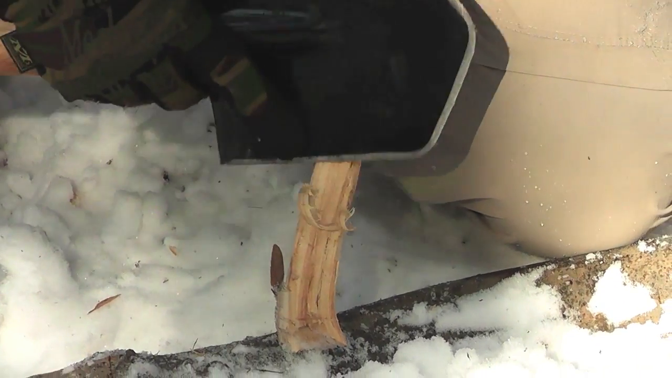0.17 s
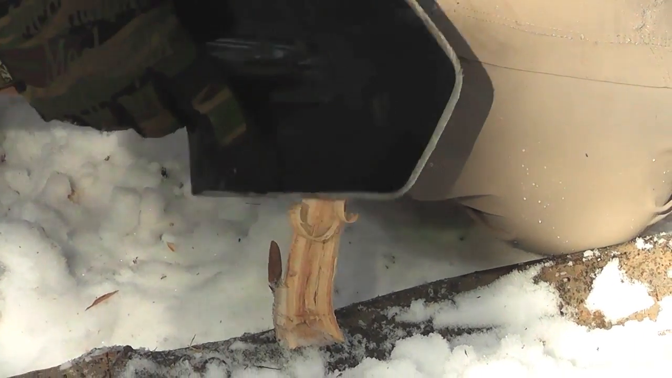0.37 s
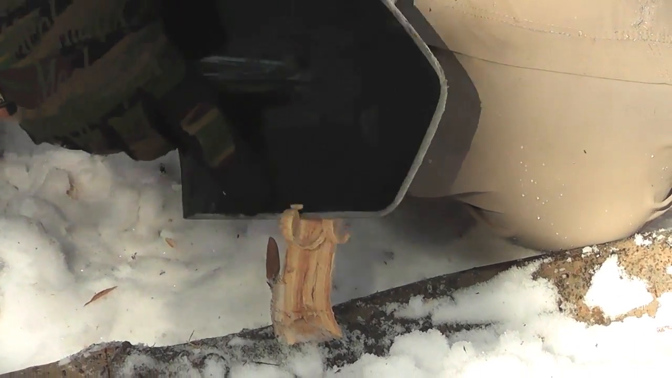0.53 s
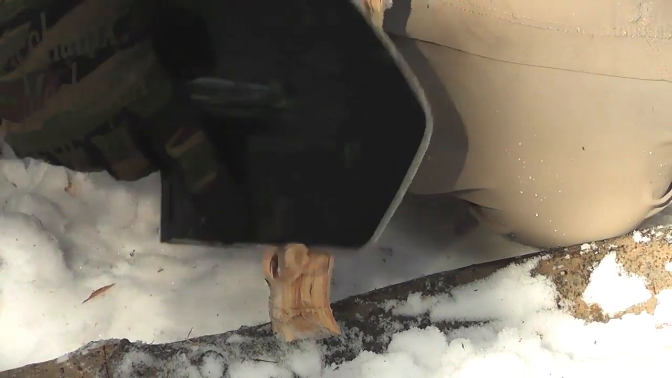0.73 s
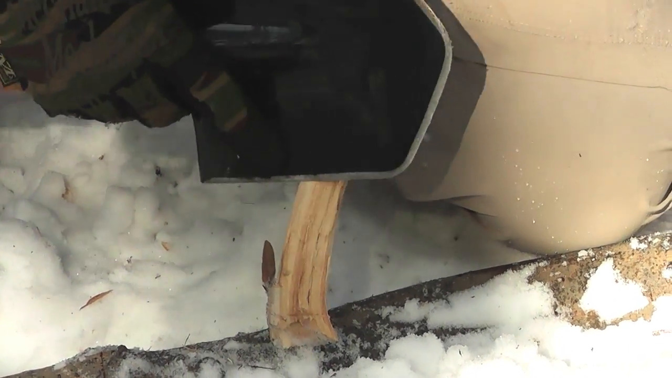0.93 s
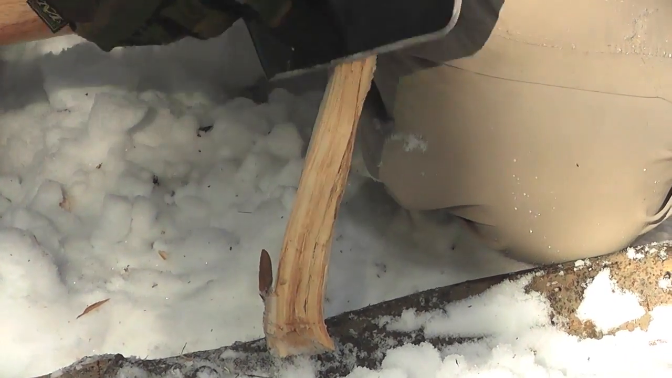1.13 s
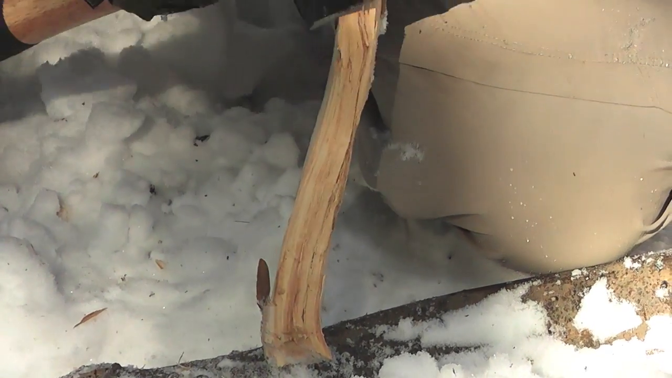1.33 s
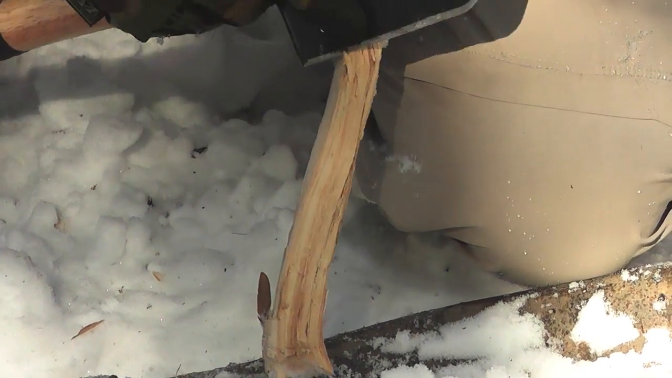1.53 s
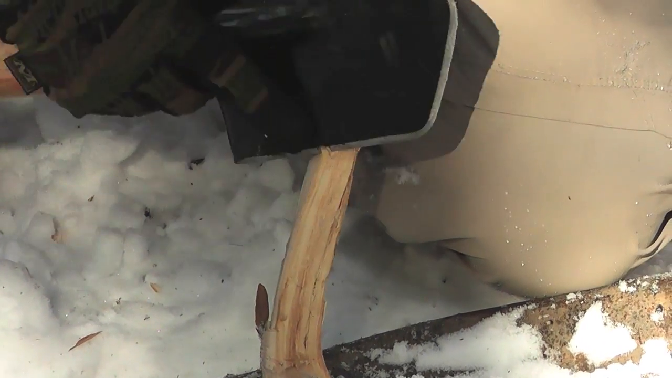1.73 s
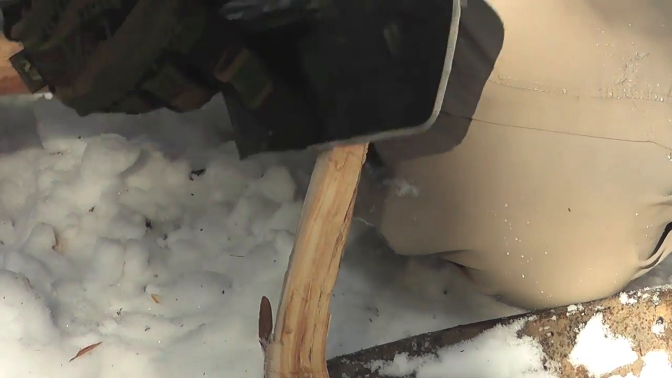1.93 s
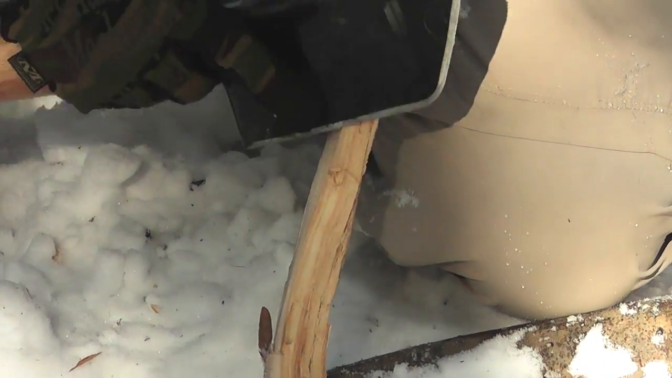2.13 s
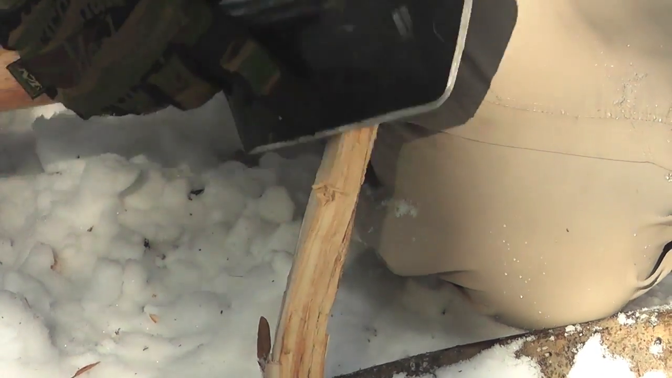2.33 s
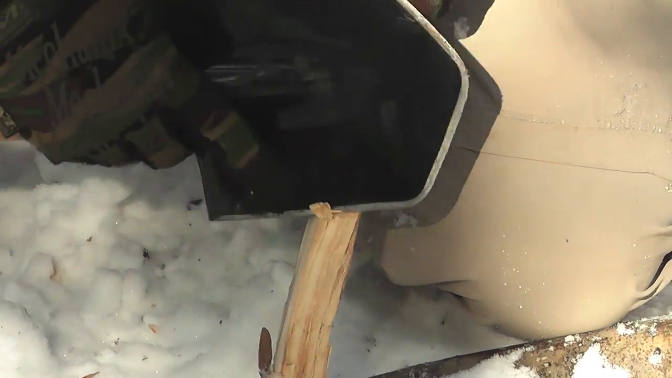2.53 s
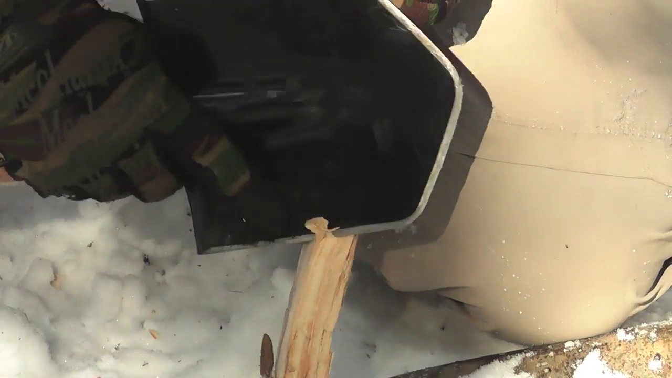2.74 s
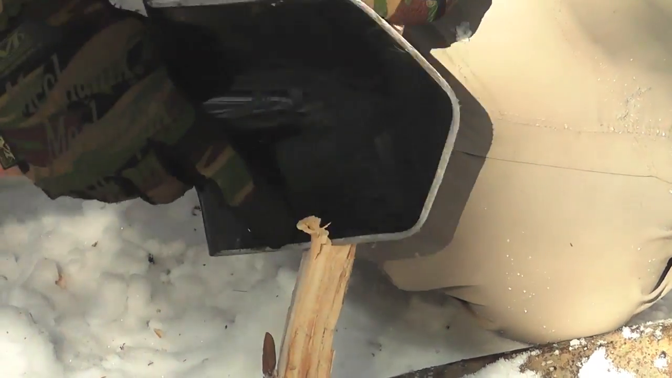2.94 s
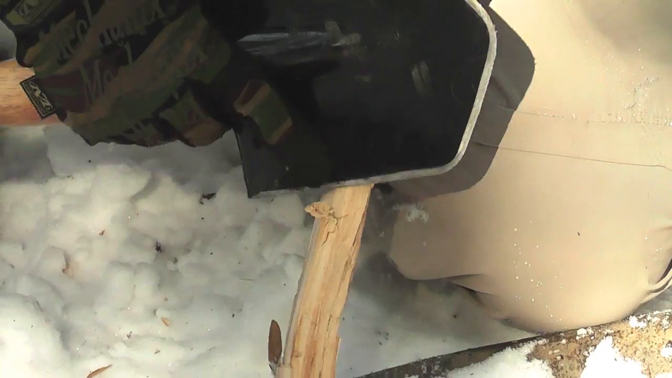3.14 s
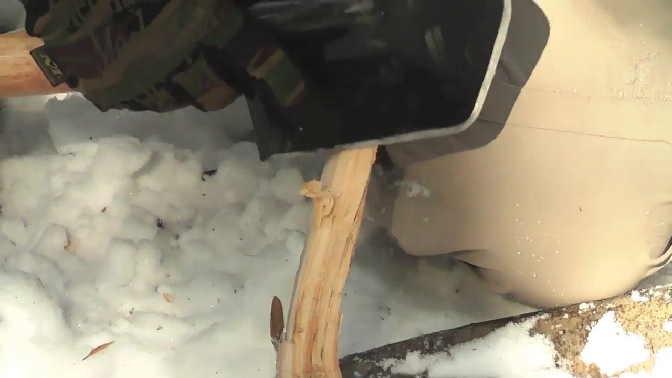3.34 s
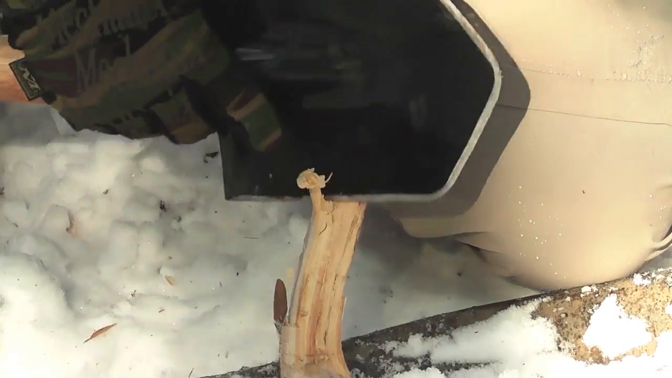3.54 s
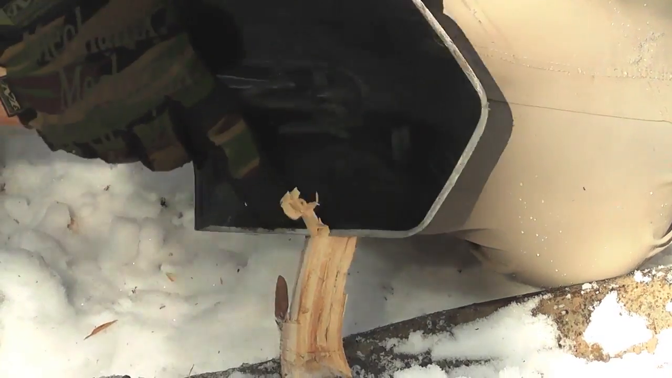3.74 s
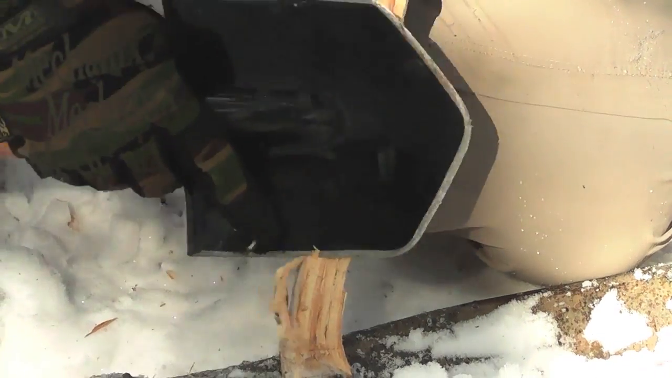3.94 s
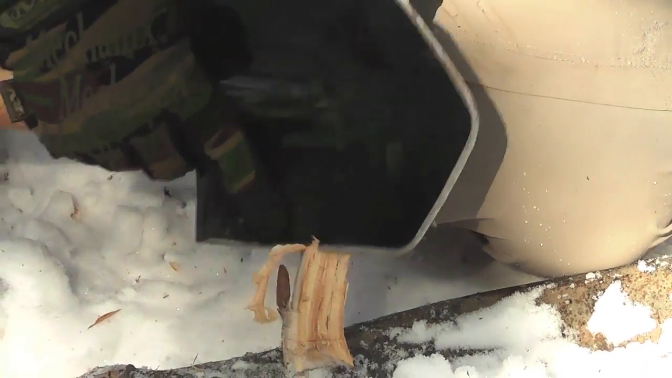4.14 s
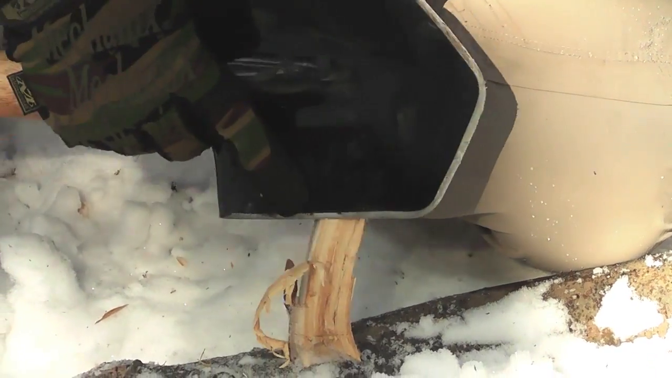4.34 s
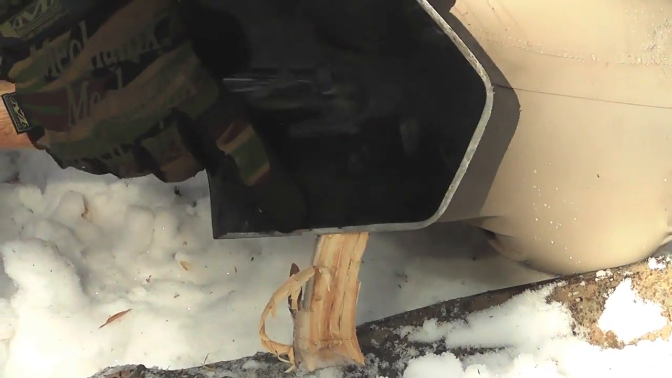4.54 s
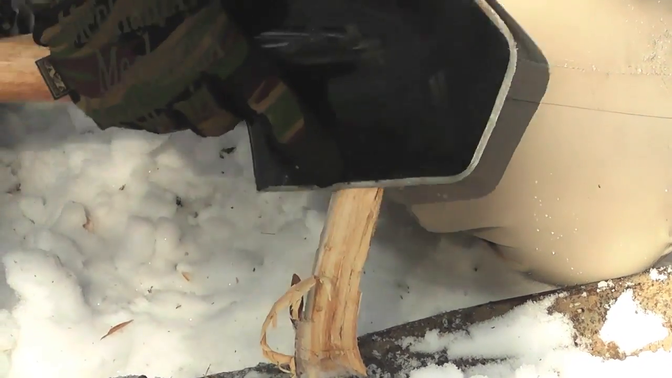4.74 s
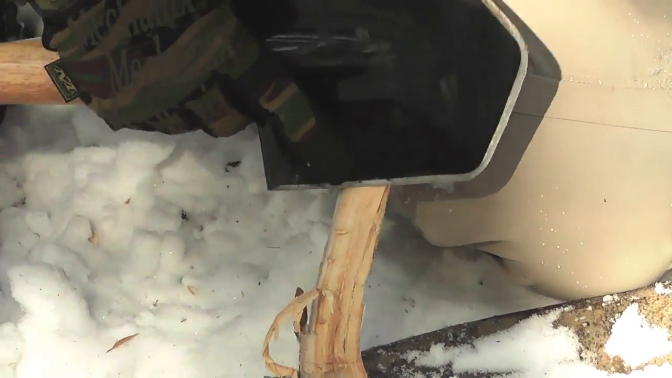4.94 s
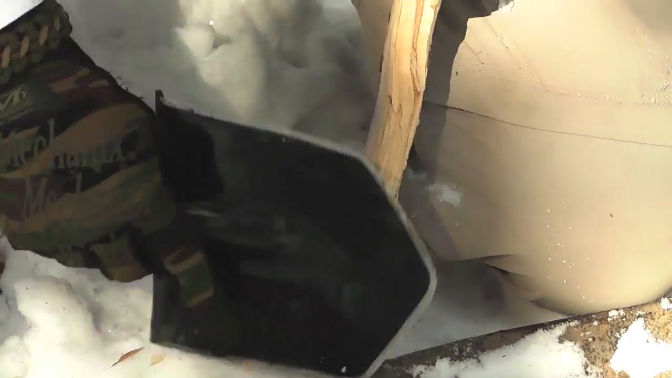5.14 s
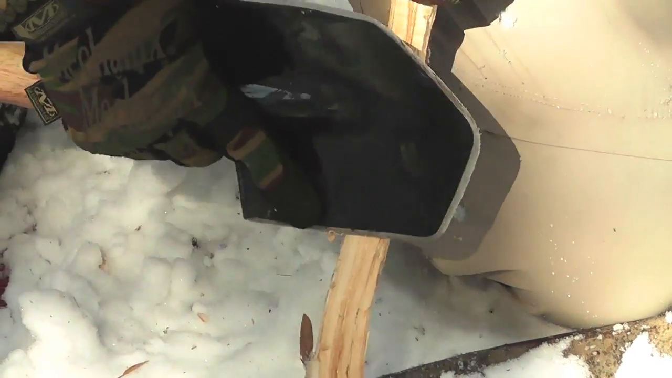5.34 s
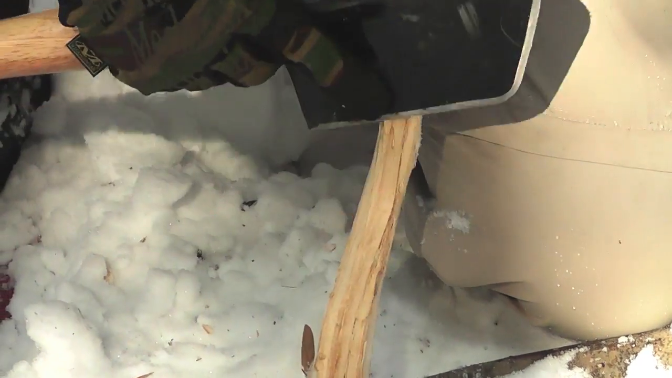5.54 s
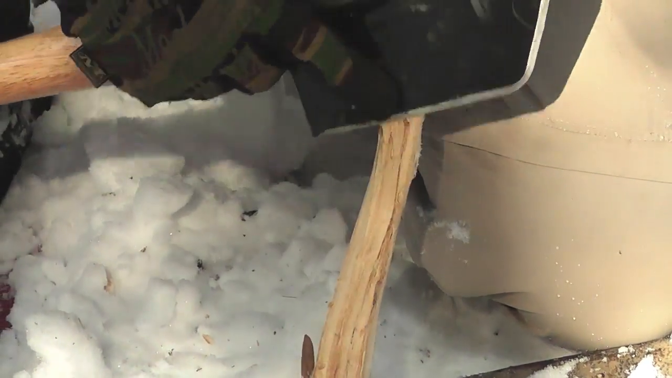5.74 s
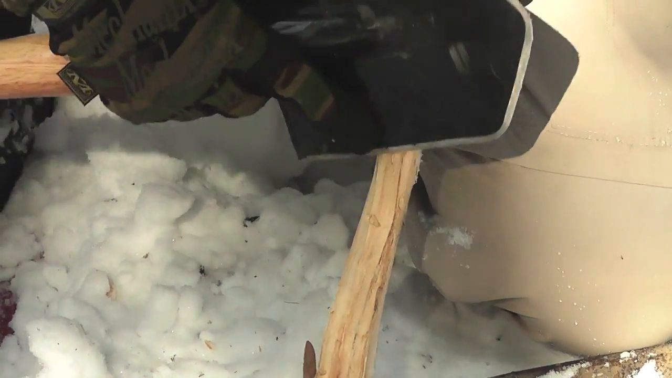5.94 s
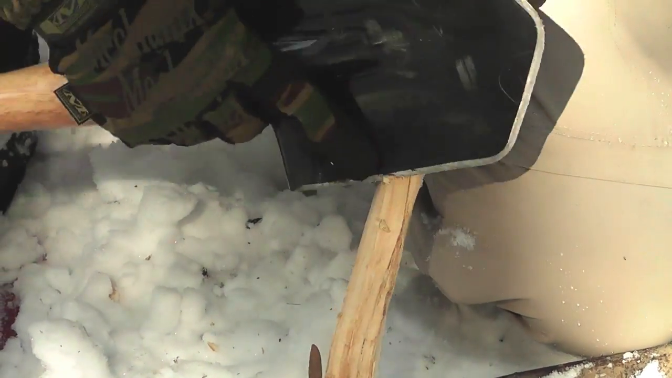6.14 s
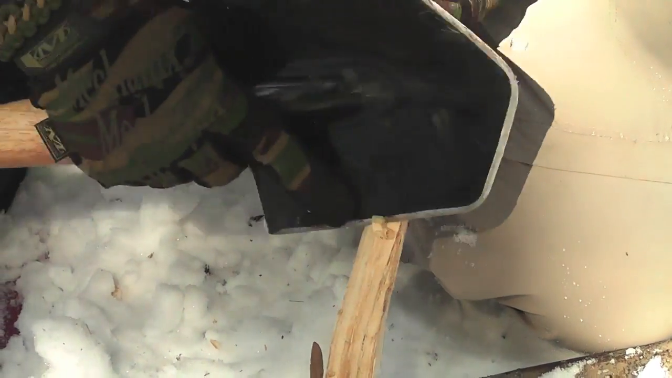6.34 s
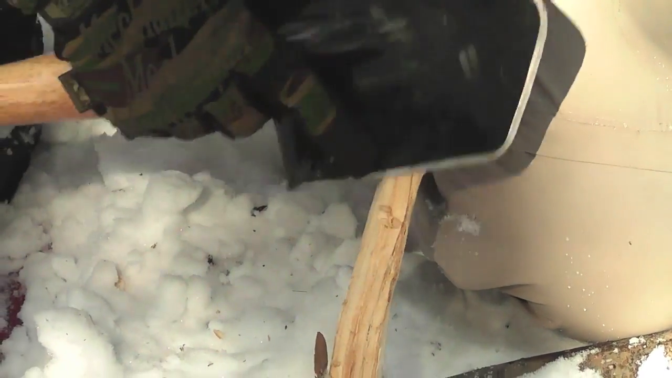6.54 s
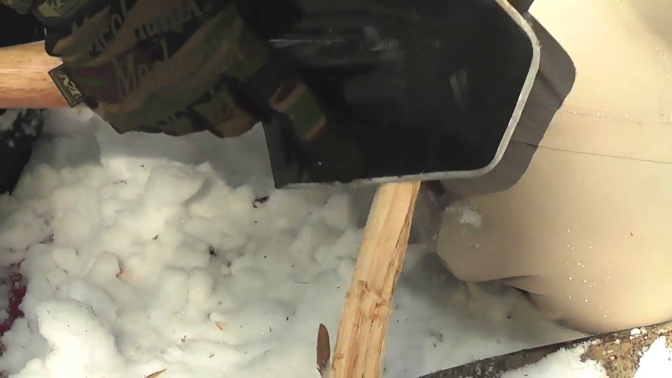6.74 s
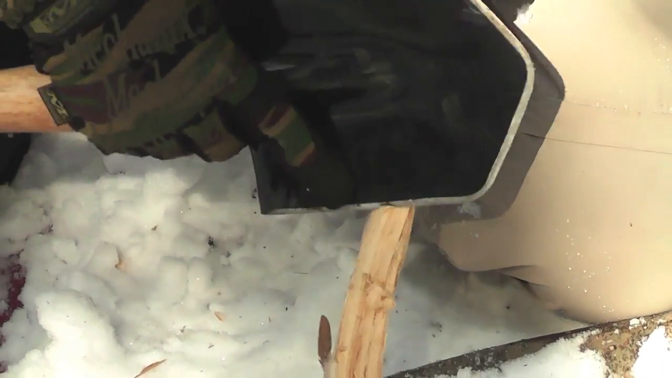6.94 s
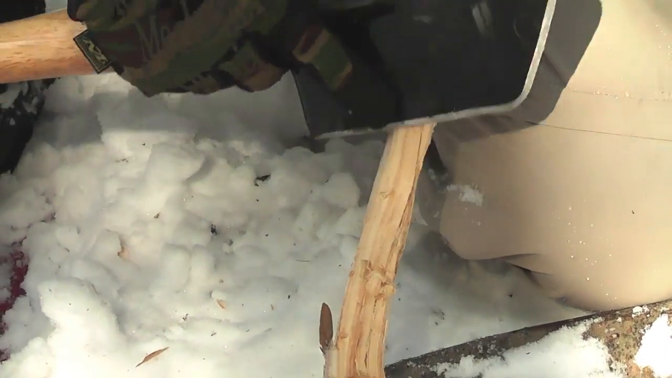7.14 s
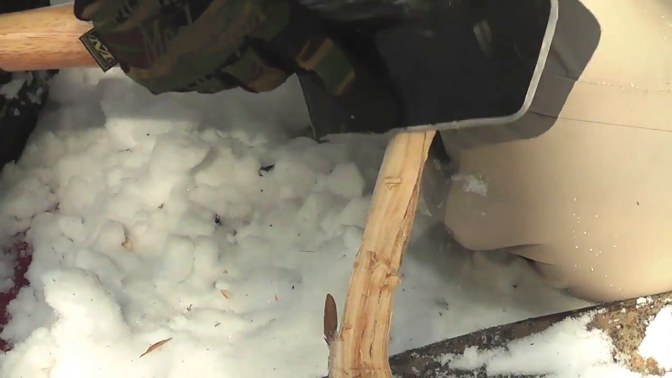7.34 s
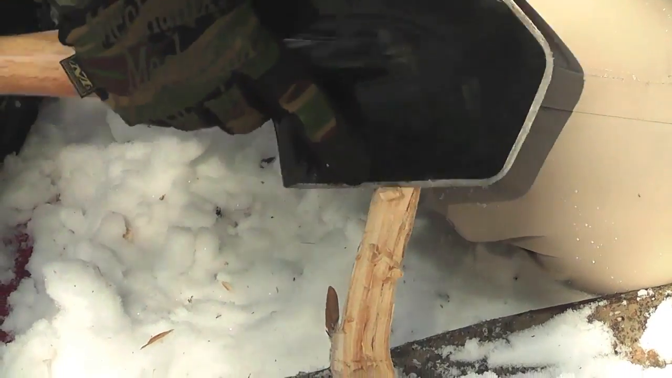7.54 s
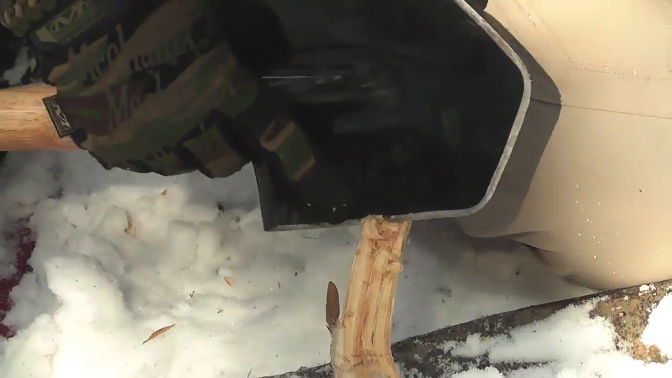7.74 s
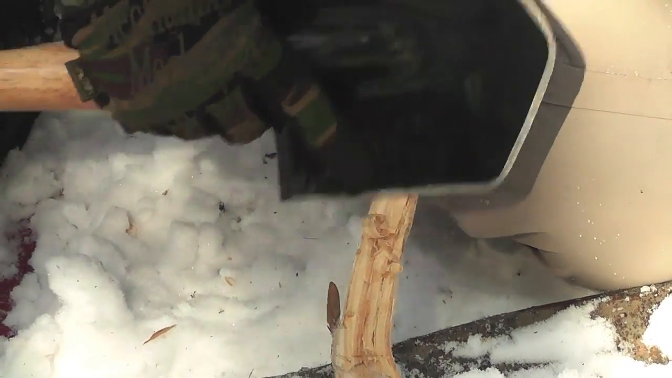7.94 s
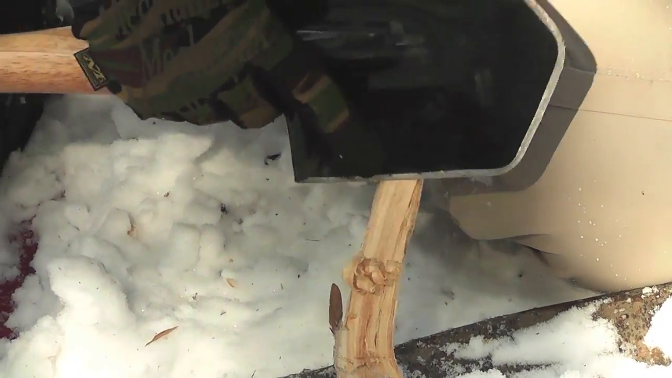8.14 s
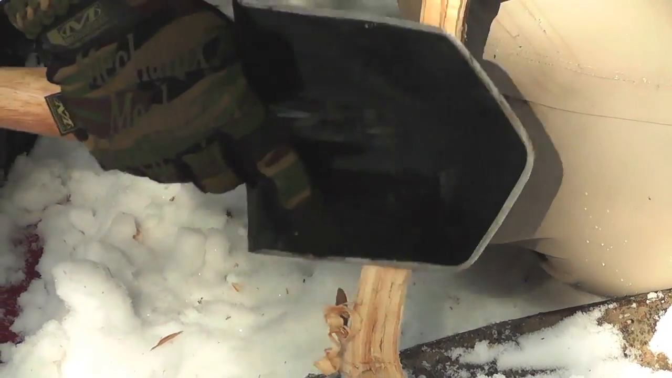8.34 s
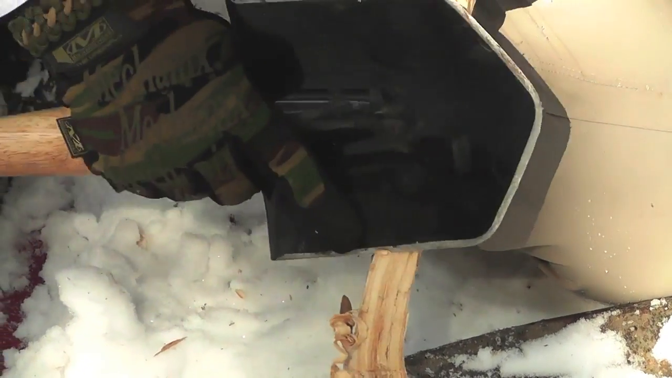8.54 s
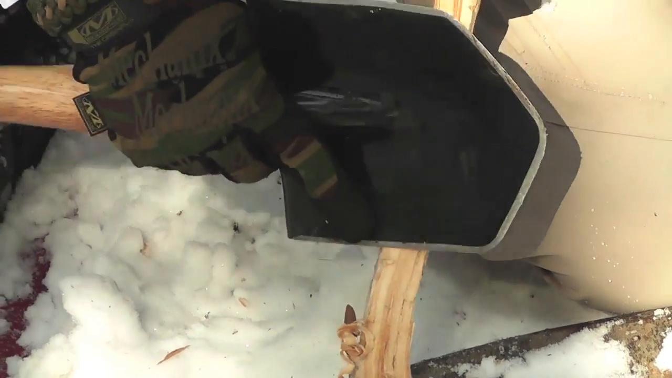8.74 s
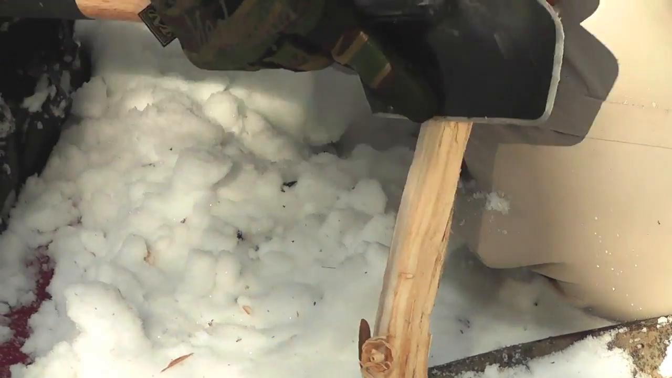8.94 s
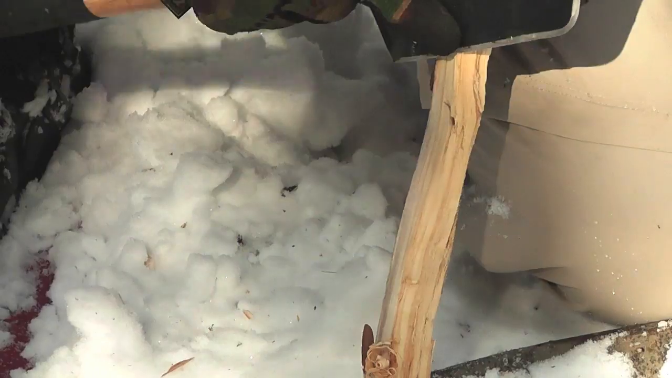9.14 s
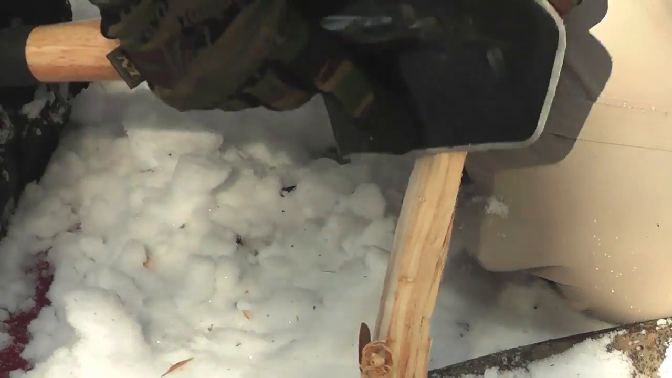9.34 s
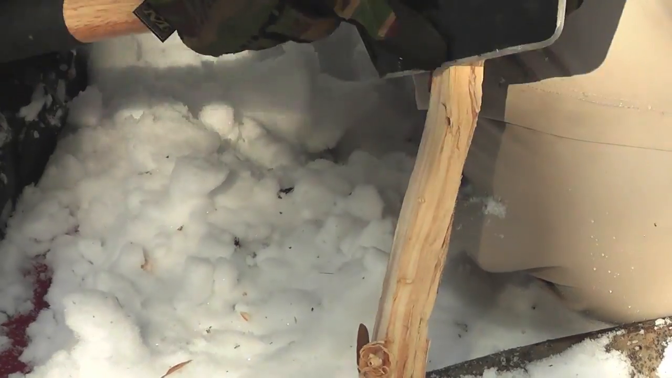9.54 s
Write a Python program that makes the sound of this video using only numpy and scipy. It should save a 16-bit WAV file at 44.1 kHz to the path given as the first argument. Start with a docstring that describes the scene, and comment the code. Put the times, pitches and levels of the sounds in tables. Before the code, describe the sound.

Close, dry scraping of a steel blade cutting curls from wood, fast bright rasps and woody taps over faint outdoor rumble and hiss.

```python
"""The sharpened edge of a steel spade shaves a dry stick in quick strokes, heard close by outdoors.
Throughout, low rumble, hiss and a faint buzz (shaped noise) lie under the edge's friction on the wood.
After a few quick bites and a lull, a run of strokes peaks near 3 s: tearing fibres (grainy noise) ring
the modes of blade and stick, bites jolt the stick on its log, and taps of the blade strike it.
After sparser strokes a loud crack (click and noise) falls near 5.6 s, then a second run, then a last bite."""
import sys
import numpy as np
from scipy import signal
from scipy.fft import rfft, irfft
from scipy.io import wavfile
from scipy.ndimage import uniform_filter1d

SR = 44100
rng = np.random.default_rng(int(sys.argv[2]) if len(sys.argv) > 2 else 0)


def unload_wav(signal):
    """Save mono or channel-first audio to the path in sys.argv[1] as 16-bit WAV at rate SR, clipped to [-1, 1]."""
    wavfile.write(
        sys.argv[1],
        SR,
        np.round(np.clip(np.atleast_2d(signal).T, -1, 1) * 32767).astype(np.int16),
    )


N = 427329


def undb(db):
    """Level definition: amplitude ratio = 10^(level / 20)."""
    return 10 ** (np.asarray(db) / 20)


def unit(x):
    """Normalisation to an rms of 1."""
    return x / np.sqrt(np.mean(x ** 2))


def noise():
    """White noise: equal mean power at all frequencies."""
    return rng.standard_normal(N)


def over_time(t_s, value):
    """Linear interpolation of a value in time."""
    return np.interp(np.arange(N) / SR, t_s, value)


def along(points, hz):
    """Interpolation of (f/Hz, value) points on a logarithmic frequency axis."""
    at, value = np.transpose(points)
    return np.interp(np.log(hz + 1), np.log(at), value)


def walk(rate):
    """Slow random modulation: levels held 1 / rate s and slewed twice; spread near 1."""
    step = 32  # samples per coarse value
    k = int(SR / rate / step)
    held = np.repeat(rng.standard_normal(N // (step * k) + 2), k)
    slewed = uniform_filter1d(uniform_filter1d(held, k), k)
    return 1.3 * np.interp(np.arange(N) / step, np.arange(len(slewed)), slewed)


def high_pass(x, cut_hz):
    """Second-order high-pass: attenuation grows below the cut-off."""
    return signal.sosfilt(signal.butter(2, cut_hz, "high", fs=SR, output="sos"), x)


def tint(x, points):
    """Spectral shaping by (f/Hz, level/dB) points; white noise keeps its level."""
    return irfft(rfft(x) * unit(undb(along(points, np.fft.rfftfreq(N, 1 / SR)))), N)


def ring(force, modes, wander_db=0, wander_rate=1):
    """Modal superposition: the contact point moves, so each mode gets a wandering share of the force."""
    out = 0
    for k, (hz, width, db) in enumerate(modes):
        pole = np.exp((2j * np.pi * hz - np.pi * width) / SR)
        gain = (-1) ** k * undb(db) * np.sqrt(width)
        drive = force * undb(wander_db * np.tanh(walk(wander_rate)))
        out = out + signal.lfilter([gain], [1, -pole], drive).imag
    # rms near 1 for a steady white force of rms 1
    return out / np.sqrt(SR / (4 * np.pi) * np.sum(undb(np.array(modes)[:, 2]) ** 2))


def grit(spread_db, grain_s):
    """Granular excitation: dense tearing as noise in equal grains of uneven loudness."""
    k = max(int(grain_s * SR), 1)
    grain_db = spread_db * np.minimum(rng.exponential(size=N // k + 1), 3.5)
    return unit(np.repeat(undb(grain_db), k)[:N] * noise())


def bursts(at_s, db, rise_s, hold_s, t60_s):
    """Exponential growth and decay: each burst rises, holds while the edge cuts and dies away."""
    out = np.zeros(N + SR)
    t = np.arange(SR // 4) / SR
    for s, d, rise, hold, t60 in np.broadcast(at_s, db, rise_s, hold_s, t60_s):
        i = int(s * SR)
        decay = undb(d - 60 * np.maximum(t - hold, 0) / max(t60, .005))
        out[i:i + len(t)] += decay * (1 - np.exp(-t / max(rise, 1e-4)))
    return out[:N]


def pushes(at_s, db, contact_s):
    """Impact mechanics: a single blow is a smooth force pulse lasting the contact time."""
    out = np.zeros(N)
    out[(np.asarray(at_s) * SR).astype(int)] = undb(db)
    pulse = np.hanning(int(contact_s * SR) + 2) / np.sqrt(contact_s * SR)
    return signal.lfilter(pulse, 1, out)


# spectrum of the outdoor air: f/Hz, relative density level/dB
AIR = [(18, -45), (30, -15), (91, -11), (115, 0), (146, -13), (332, -13), (388, -24), (904, -14),
       (1570, -30), (1840, -14), (2340, -31), (5440, -28), (15200, -40), (16500, -47)]
# left-right likeness of the air: f/Hz, correlation (-1 to 1)
AIR_ALIKE = [(30, 0.1), (60, 0.34), (200, 0.067), (400, 0.033), (1300, 0.1), (2400, 0.59), (8000, 1),
             (15000, 0.1)]
AIR_DB = -57.5  # level about which the air swells


def air():
    """Partial coherence: rumble and hiss as independent sum and difference noises, swelling a little."""
    hz = np.fft.rfftfreq(N, 1 / SR)
    alike = np.clip(along(AIR_ALIKE, hz), -1, 1)
    spectrum = undb(along(AIR, hz))
    mid = irfft(rfft(noise()) * spectrum * np.sqrt(1 + alike), N)
    side = irfft(rfft(noise()) * spectrum * np.sqrt(1 - alike), N)
    return unit(np.array([mid + side, mid - side])) * undb(AIR_DB + 1.1 * walk(3.))


# bands of the buzz: f/Hz, width/Hz, level/dB, place in cycle (0-1)
BUZZ = [(1900, 250, -73, .40), (3200, 300, -78, .12), (5800, 1200, -81, .12)]
BUZZ_HZ = 59.94


def buzz():
    """Periodic excitation: resonant bands tick once a cycle, every other cycle stronger."""
    out = 0
    for hz, width, db, place in BUZZ:
        cycle = np.arange(N) * BUZZ_HZ / SR - place
        decay = np.exp(-(cycle % 1) / 0.028)  # time constant in cycles
        puff = decay * undb(3.4 * (cycle // 1 % 2)) * noise()
        out = out + undb(db) * unit(ring(puff, [(hz, width, 0)]))
    return out


# single fibres snapping: t/s, peak level/dB, centre f/Hz, T60 of the after-cracks/s
SNAPS = [(1.622, -46, 9000, .01), (1.741, -47, 5000, 0.018), (2.487, -31.5, 4520, 0.031),
         (2.627, -37.5, 6460, 0.014), (4.982, -32.5, 2840, 0.0071), (5.208, -34, 8750, 0.035),
         (5.583, -14.5, 8300, 0.0095), (6.208, -41.5, 8000, 0.015), (6.352, -39, 10000, .01),
         (6.894, -24.5, 8700, 0.024), (.718, -46, 13000, .01), (.928, -35, 12000, .01)]


def snaps():
    """Impulsive fracture: a dry click and decaying after-crackle pass a wide band."""
    out = np.zeros(N)
    t = np.arange(SR // 20) / SR
    for s, db, hz, t60_s in SNAPS:
        force = (t == 0) + 0.84 * rng.standard_normal(len(t)) * undb(-60 * t / t60_s)
        edges = [hz / 1.2, min(hz * 1.14, 19000)]
        click = signal.sosfilt(signal.butter(1, edges, "band", fs=SR, output="sos"), force)
        i = int(s * SR)
        out[i:i + len(t)] += undb(db) * click / np.max(np.abs(click))
    return out


# the edge is this far down one rise before and one fall after its peak; roundness 1 pointed, 2 round
SLIDE_RISE_DB, SLIDE_FALL_S, SLIDE_ROUND = 23.5, 0.047, 1.65


def strokes(at_s, rise_s, db):
    """Amplitude envelope of a stroke: each slide swells, rounds over and stops."""
    out = np.zeros(N + 2 * SR)
    t = np.arange(-SR // 2, SR // 2) / SR
    for s, rise, d in zip(at_s, rise_s, db):
        i = int(s * SR) + SR // 2
        from_peak = np.where(t < 0, -t / rise, t / SLIDE_FALL_S)
        out[i:i + SR] += undb(d - SLIDE_RISE_DB * from_peak ** SLIDE_ROUND)
    return out[SR:SR + N]


# edge resting on the wood between strokes: t/s, relative blade level/dB, relative low shudder level/dB
REST = [(0, -69, -60), (.9, -72, -59.5), (1.35, -58, -62.5), (1.65, -62.5, -58.5), (2.4, -62, -57),
        (3.4, -60, -58), (4.4, -58.5, -57), (4.55, -68, -63), (4.7, -60, -58), (4.8, -70, -54),
        (5.2, -56, -54), (5.4, -56, -55), (5.7, -56, -60), (6.2, -71.5, -59), (6.72, -60.5, -51),
        (7, -62.5, -62.5), (7.9, -62, -57), (8.5, -72, -53.5), (8.7, -71, -60.5), (8.95, -49.5, -62),
        (9.2, -60.5, -57), (9.38, -54, -55), (9.69, -72, -59.5)]
# edge sliding down and back: peak t/s, rise/s, relative blade level/dB, relative stick level/dB
SLIDES = [(0.01, .05, -45, -50), (0.137, 0.049, -39.5, -45.5), (0.276, .08, -50, -54),
          (0.366, 0.038, -40.5, -48), (0.502, 0.094, -44, -54), (0.601, 0.045, -36.5, -42),
          (0.738, 0.064, -54.5, -62), (0.82, 0.038, -41.5, -52), (0.958, 0.064, -43, -47),
          (1.207, 0.26, -51, -55), (1.301, 0.047, -48, -82), (1.476, 0.035, -41, -50),
          (1.763, 0.057, -34.5, -38), (1.902, 0.026, -52, -55.5), (2.031, 0.076, -43.5, -52),
          (2.199, 0.07, -55, -63), (2.279, 0.035, -43.5, -51), (2.522, .04, -45, -47.5),
          (2.678, 0.024, -53, -60), (2.772, 0.033, -41.5, -53), (2.936, 0.064, -51, -60),
          (3.024, 0.044, -44, -62), (3.263, 0.033, -46, -54), (3.51, 0.043, -42.5, -50),
          (3.757, 0.044, -44, -54), (3.865, 0.031, -63, -60), (3.991, 0.028, -34, -42.5),
          (4.228, 0.025, -36.5, -45), (4.37, 0.052, -55, -56), (4.45, 0.034, -53, -54.5),
          (4.741, 0.032, -44, -46.5), (4.853, 0.025, -46, -50), (5.021, 0.061, -51.5, -56),
          (5.12, 0.024, -41, -69), (5.3, 0.026, -48, -50), (5.37, 0.1, -61, -66), (5.543, 0.091, -56, -60),
          (5.873, 0.058, -40, -49), (6.028, 0.12, -51.5, -58.5), (6.11, 0.046, -48, -57),
          (6.31, 0.11, -55.5, -62), (6.423, 0.086, -45.5, -51), (6.532, 0.029, -51.5, -60),
          (6.658, 0.035, -43, -43), (6.846, 0.36, -53.5, -55), (6.921, 0.025, -46, -57),
          (7.118, 0.043, -49.5, -53), (7.288, 0.087, -55, -53), (7.419, 0.034, -51, -62.5),
          (7.551, 0.08, -45, -54), (7.708, 0.051, -55, -70), (7.798, 0.029, -36, -42),
          (7.915, .04, -60.5, -56), (8.082, 0.082, -39.5, -41.5), (8.159, 0.015, -55, -54),
          (8.329, 0.031, -34, -39.5), (8.367, .04, -42.5, -55), (8.444, 0.03, -45, -47.5),
          (8.501, 0.09, -51, -53), (8.562, 0.022, -41, -50), (8.88, 0.068, -58, -50),
          (9.149, 0.1, -53, -90), (9.277, 0.018, -44, -49.5), (9.321, 0.03, -44.5, -68),
          (9.52, 0.11, -48, -66), (9.685, 0.03, -37.5, -43.5)]
REST_STICK_DB, SLIDE_SHUDDER_DB = -4, -13.5  # stick against blade at rest; shudder against stick in a slide


def friction():
    """Stick-slip friction: the edge catches and slips, loading blade, stick and low shudder together."""
    t_s, rest_db, tremor_db = np.transpose(REST)
    peak_s, rise_s, edge_db, rub_db = np.transpose(SLIDES)
    catch = undb(1.5 * walk(60.))
    rest = undb(over_time(t_s, rest_db))
    tremor = undb(over_time(t_s, tremor_db))
    drag = strokes(peak_s, rise_s, rub_db)
    slide = catch * (rest + strokes(peak_s, rise_s, edge_db))
    rub = catch * (rest * undb(REST_STICK_DB) + drag)
    shudder = catch * (tremor + drag * undb(SLIDE_SHUDDER_DB))
    return slide, rub, shudder


# modes of the stick: f/Hz, width/Hz, relative level/dB
STICK = [(437, 29, -10), (494, 72, -3), (626, 220, -2.5), (772, 72, -5), (969, 54, -4.5), (1231, 130, 0.5),
         (1450, 246, 2), (1596.5, 108, 1), (1030, 3600, -1.5), (2300, 99, -12)]
# modes of the stick on its log: f/Hz, width/Hz, relative level/dB
JOLT = [(120, 120, -7.5), (179.4, 53.5, 6.5), (349, 109, 3.5)]


def stick(wood, low):
    """Modal radiation: the stick's own modes and its low modes on the log; thin, so no deep bass."""
    body = ring(wood, STICK, wander_db=4, wander_rate=7.8)
    body = body + ring(low, JOLT, wander_db=1.5, wander_rate=5.3)
    return high_pass(body, 75)


# modes of the steel plate: f/Hz, width/Hz, relative level/dB
BLADE = [(3833, 100, -4), (4007, 52, -4), (4680, 50, -25), (5145, 58, -1.5), (5570, 200, -5),
         (5947, 85, -2.5), (6730, 240, -3), (7220, 72, -2.5), (7890, 220, -4.5), (8530, 140, -4),
         (8826, 53, 5.5), (9400, 66, -6), (10600, 490, -0.5), (10810, 75, -4), (11400, 100, -3),
         (12070, 81, -7), (13000, 92, -6), (14850, 280, -7.5)]
# broad tearing of fibres: f/Hz, relative density level/dB
FIBRES = [(1800, -24), (2600, -39), (3500, -14), (4200, 5), (7000, -4.5), (9200, 11.5), (10500, 2.5),
          (12500, -25)]
# finest splitting: f/Hz, relative density level/dB
SIZZLE = [(9500, 1), (11000, -12.5), (12500, 10.5), (14000, 0), (15300, -3), (16500, -34)]


def blade(stroke, fine):
    """Forced plate vibration: grainy tearing excites steel modes beneath the hiss of splitting fibres."""
    steel = ring(stroke * grit(spread_db=-1.4, grain_s=.0004), BLADE, wander_db=7, wander_rate=15.)
    steel = high_pass(steel, 3500)  # the plate radiates little below its modes
    tearing = tint(stroke * grit(spread_db=3.5, grain_s=0.0012), FIBRES)
    sizzle = tint(fine * grit(spread_db=1.5, grain_s=0.0009), SIZZLE)
    return undb(-7.0) * steel + undb(-7.5) * tearing + sizzle


# edge biting into the grain: t/s, then relative level/dB of blade, stick, singing mode and jolt,
# then rise/s, hold/s, jolt lag/s
BITES = [(0.143, -34.5, -39, -44, -32, 0.00049, 0.0063, 0.0053),
         (0.375, -36, -34.5, -59, -25.5, 0.00066, 0.018, 0.014),
         (0.619, -50, -54, -61, -36.5, 0.00029, 0.021, 0.013),
         (0.818, -47, -46, -65, -37.5, 0.00068, 0.021, .0027),
         (1.471, -40, -71, -69, -46, 0.0089, 0.043, 0), (1.773, -28, -38, -53, -31.5, 0.0043, 0.017, 0.016),
         (2.031, -38, -33.5, -47, -30.5, 0.00088, 0.035, .028),
         (2.278, -28, -35, -56, -30, 0.00028, 0.0067, 0.00098),
         (2.527, -24.5, -34, -58, -28.5, .0011, 0.0041, 0.0051),
         (2.7721, -22, -30.5, -46, -23.5, 0.00029, 0.004, 0.00017),
         (3.0221, -13.5, -30, -38, -22.5, 0.0015, 0.003, 0),
         (3.27, -21.5, -32, -52, -25.5, 0.003, 0.0075, 0.0041),
         (3.5121, -19.5, -29.5, -59, -21, .0013, 0.0065, 0),
         (3.532, -37, -56, -62, -57, 0.0015, 0.0034, 0.018),
         (3.756, -24, -37, -70, -26, 0.0024, 0.011, 0.0073),
         (3.991, -20.5, -29, -40.5, -20.5, 0.00021, 0.0058, 0),
         (4.247, -28.5, -38, -51, -28, 0.00033, 0.0098, .0004),
         (4.857, -36, -36, -66, -34.5, 0.0044, 0.019, 0.004),
         (5.1202, -30, -29.5, -46, -29, 0.00078, 0.011, 0),
         (5.147, -33, -42, -56, -37, 0.00096, 0.017, .0079),
         (5.871, -32, -38, -65, -39.5, .011, 0.037, 0.031),
         (6.104, -35, -36.5, -60, -33.5, 0.0097, 0.031, 0.025),
         (6.391, -30.5, -34.5, -57, -31.5, 0.00182, 0.031, .0044),
         (6.661, -26.5, -30, -38.5, -33.5, 0.00065, 0.0072, 0.006),
         (6.675, -34.5, -39, -43, -35, .0012, 0.037, 0.021),
         (6.9217, -31.5, -31.5, -37.5, -32.5, 0.0036, 0.0059, 0.011),
         (7.259, -29.5, -32, -59, -31.5, 0.0072, 0.029, 0.024),
         (7.5293, -20.5, -28.5, -45.5, -31, 0.000053, 0.0089, 0),
         (7.796, -24.5, -34.5, -48, -21.5, 0.00026, 0.016, .0049),
         (8.057, -21.5, -28, -64, -27.5, 0.0012, 0.011, 0.013),
         (8.3436, -28.5, -37, -53, -27.5, 0.00031, 0.015, 0.0047),
         (8.558, -45.5, -43.5, -63, -33, 0.0019, 0.02, 0.019),
         (9.353, -39, -39.5, -52, -42, 0.0058, 0.021, 0.014)]
# blade tapping the stick: t/s, then relative level/dB of stick, blade and jolt
TAPS = [(0.067, -52, -66, -48), (0.275, -42.5, -55, -58), (.31, -58, -68, -50), (.538, -54, -71, -46),
        (2.464, -42, -69, -49), (2.714, -61, -66, -47), (3.215, -60, -60, -51), (3.455, -37, -63, -43),
        (6.559, -45, -48, -46), (1.083, -56, -57, -36.5), (2.426, -30, -47, -41), (2.485, -29.5, -61, -59),
        (3.183, -26, -42, -44), (3.432, -22.5, -36, -39), (3.669, -28, -44, -54), (4.039, -40, -58, -50),
        (4.151, -17.5, -35.5, -39), (4.448, -45, -47, -39), (5.271, -43, -42, -53), (6.822, -23, -42, -48),
        (7.967, -23, -33.5, -40), (7.472, -57, -67, -49), (7.737, -57, -67, -46), (8.272, -52, -60, -46),
        (8.231, -34.5, -38, -37), (8.483, -29, -42, -53), (9.421, -32.5, -53, -46)]
# the blade's lightly damped low mode: f/Hz, width/Hz, relative level/dB
SING = [(2179, 18.5, 0)]
# finest splitting as the work moves along the stick: t/s, relative level/dB
SIZZLE_LEVEL = [(0, 2.5), (1.8, -2.5), (2.6, 1), (3.1, -0.5), (3.6, -4.5), (4.5, -2), (6.2, 2), (7.2, 4),
                (8.2, -1), (9.69, -1)]
BITE_T60_S = 0.029
SIZZLE_DB, SIZZLE_PER_DB = -44.5, 0.87  # sizzle drive of a -28 dB bite, and its growth with the bite
ROCK_DB, ROCK_T60_S = -15.5, 0.03  # the stick rocks on after a jolt


def shaving():
    """Source-resonator coupling: slides, bites and taps all drive blade and stick."""
    slide, rub, shudder = friction()
    at, bite_db, wood_db, sing_db, jolt_db, rise_s, hold_s, lag_s = np.transpose(BITES)
    tap, tap_db, ping_db, thud_db = np.transpose(TAPS)

    def bite(db):
        """Transient cutting force: one burst for each bite."""
        return bursts(at, db, rise_s, hold_s, BITE_T60_S)

    light = slide + bursts(tap, ping_db, 0.00014, 0, 0.035)
    steel = light + bite(bite_db)
    fine = light * undb(-11.5 + 2.82 * walk(6.))
    fine = fine + bite(SIZZLE_DB + SIZZLE_PER_DB * (bite_db + 28))
    fine = fine * undb(over_time(*np.transpose(SIZZLE_LEVEL)))
    sing = bite(sing_db) * noise()

    chatter = bursts(tap, tap_db - 6.0, 0.00038, 0, 0.049)  # the blade rattles on after a tap
    wood = (rub + chatter + bite(wood_db)) * grit(spread_db=4.0, grain_s=.001)
    wood = wood + pushes(tap, tap_db + 13.0, contact_s=0.00057)
    # the bite also knocks the stick, less the slower it rises
    wood = wood + pushes(at + rise_s, wood_db + 23.5 - 3000 * rise_s, contact_s=0.00045)

    rock = bursts(at + lag_s, jolt_db + ROCK_DB, 0.0016, 0.024, ROCK_T60_S)
    low = (shudder + rock) * noise()
    # the stick is jolted when the curl breaks free
    low = low + pushes(at + lag_s, jolt_db + 12.0, contact_s=0.0037)
    low = low + pushes(tap + 0.00553, thud_db + 15.5, contact_s=0.00058)
    return blade(steel, fine) + ring(sing, SING) + stick(wood, low)


# difference between the two microphone ports: f/Hz, relative side-to-mid level/dB
PORTS = [(60, -10), (110, -21), (200, -16), (380, -9), (700, -11), (1290, -18), (2380, -21), (4400, -27),
         (8120, -25), (11000, -13), (15000, -8)]


def scene():
    """Superposition at two ports: a quadrature side signal, strongest in bass, low mids and top treble,
    wavers quickly in level."""
    near = shaving() + snaps() + buzz()
    side_gain = undb(along(PORTS, np.fft.rfftfreq(N, 1 / SR)))
    side = irfft(1j * rfft(near) * side_gain, N) * (0.79 + .6 * walk(30.))
    return near + side * np.array([[1], [-1]]) + air()


LOW_CUT_HZ, TOP_HZ = 45, 16300


def record(dry):
    """Band limitation: the pickup cuts the deep bass and the top."""
    dry = high_pass(dry, LOW_CUT_HZ)
    return signal.sosfilt(signal.ellip(12, .2, 90, TOP_HZ, fs=SR, output="sos"), dry)


dry = scene()
out = record(dry)
unload_wav(out)
```